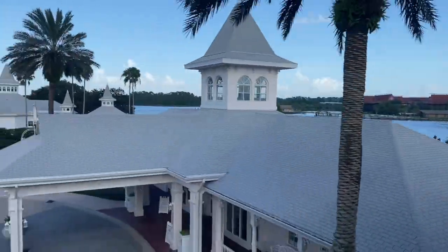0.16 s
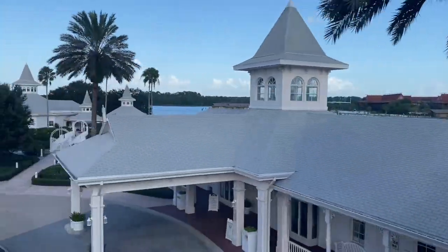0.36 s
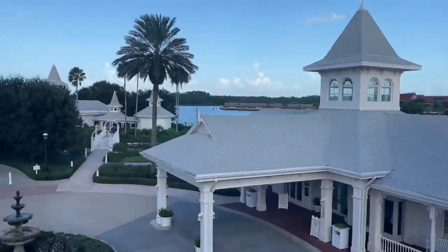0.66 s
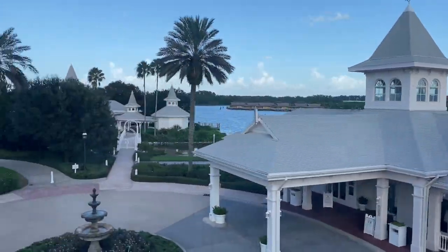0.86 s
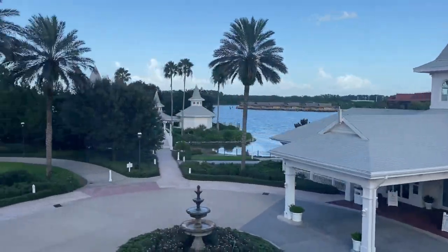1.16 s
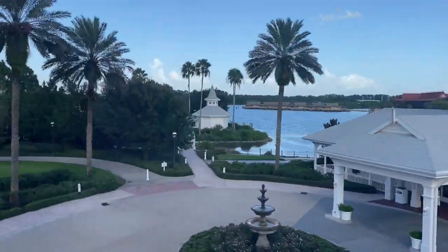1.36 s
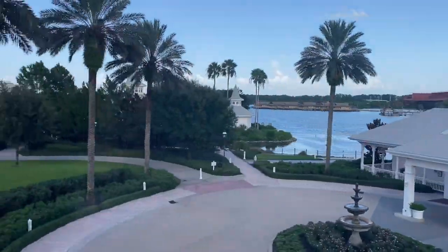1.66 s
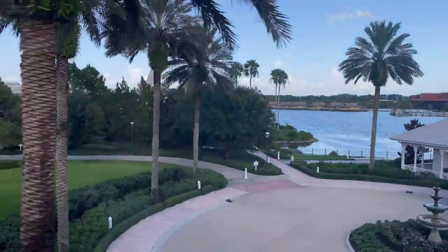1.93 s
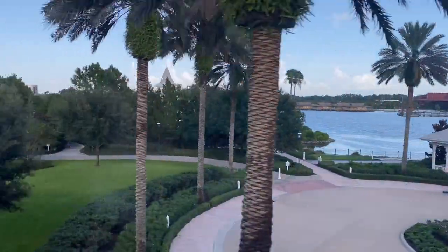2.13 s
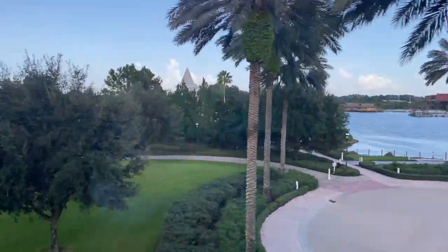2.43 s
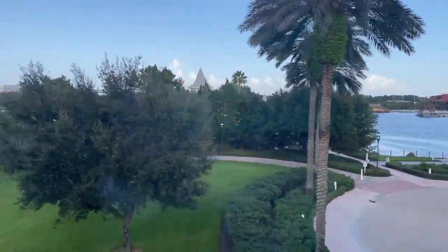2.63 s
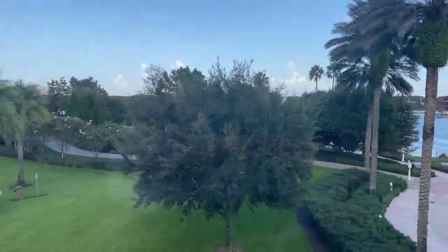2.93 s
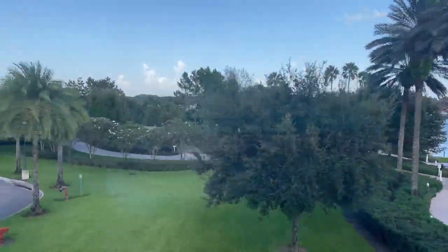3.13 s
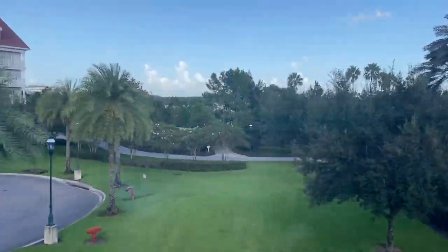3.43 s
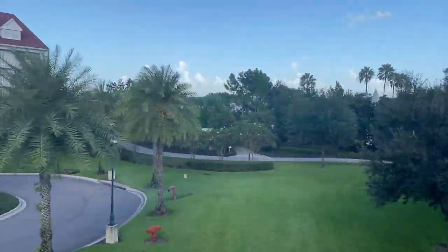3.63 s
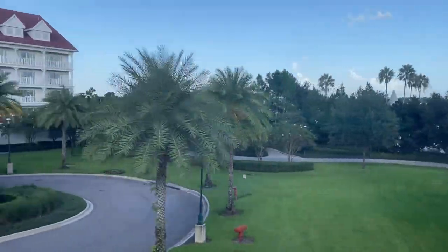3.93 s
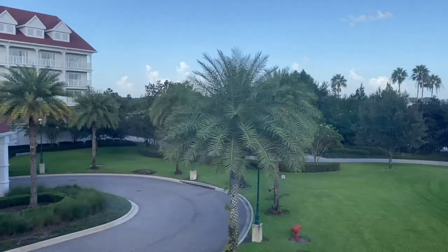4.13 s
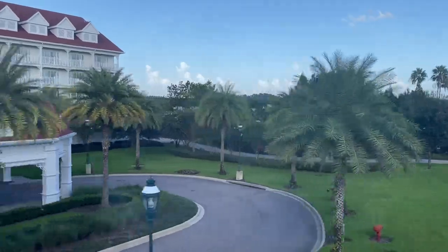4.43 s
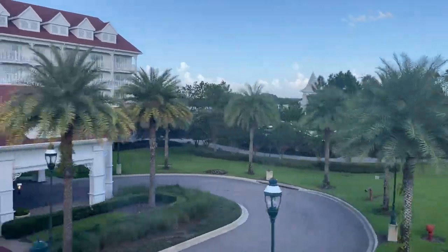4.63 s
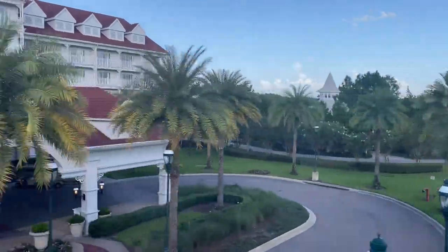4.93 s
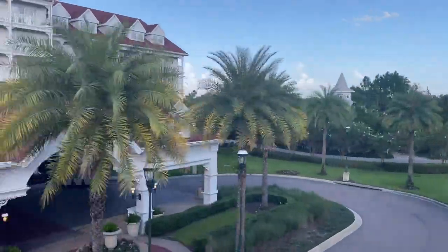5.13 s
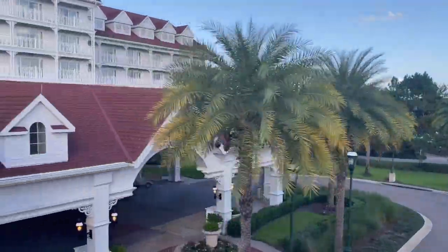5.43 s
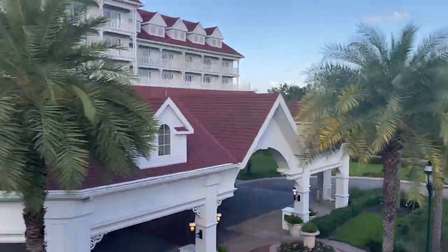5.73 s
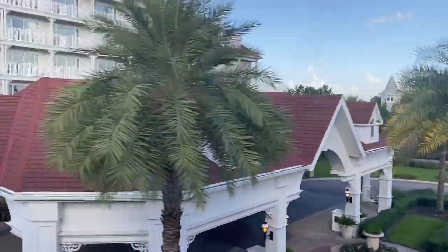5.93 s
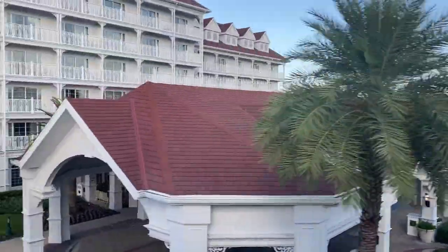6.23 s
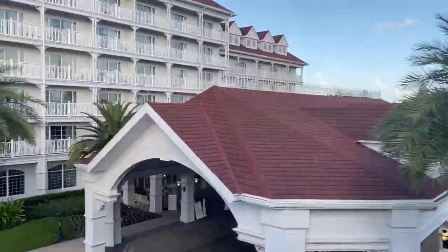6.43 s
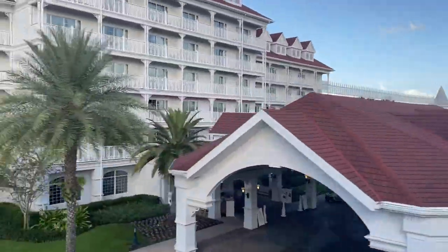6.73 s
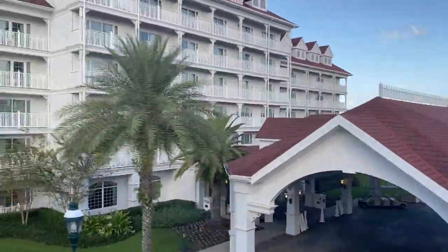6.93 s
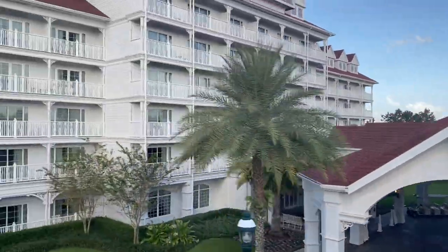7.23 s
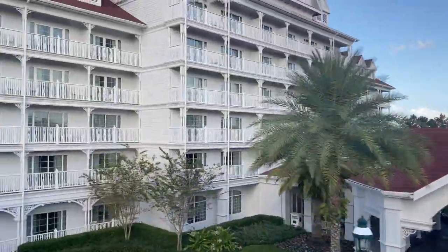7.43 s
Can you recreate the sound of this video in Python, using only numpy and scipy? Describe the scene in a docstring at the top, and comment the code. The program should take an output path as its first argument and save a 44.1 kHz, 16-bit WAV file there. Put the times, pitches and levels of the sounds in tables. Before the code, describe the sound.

Inside a moving train car, rubber tyres rumble deeply while motor tones hum and sink as it slows, over steady ventilation rush.

```python
"""Inside a monorail car, close to a window, as it runs along its beam and slows in the second half.
Nearest and loudest, the rubber tyres rumble, boom and hiss as filtered noise; bumps knock the panels as short tones.
Drive tones at multiples of the shaft rate sink with the speed and swell as they cross cabin resonances; gears rasp.
Behind them ventilation noise rushes through ringing ducts, a blower sings and electrics whistle as wavering sines.
Now and then trim ticks and rattles and surfaces rustle; a phone's stereo microphones take it all in."""
import sys
import numpy as np
from scipy import signal
from scipy.fft import rfft, irfft
from scipy.io import wavfile
from scipy.ndimage import uniform_filter1d, minimum_filter1d

SR = 44100
rng = np.random.default_rng(int(sys.argv[2]) if len(sys.argv) > 2 else 0)


def pcm_store(signal):
    """Save signal as 16-bit PCM."""
    levels = np.round(np.clip(np.atleast_2d(signal), -1, 1) * 32767)
    wavfile.write(sys.argv[1], SR, levels.astype(np.int16).T)


N = 333792
TIME = np.arange(N) / SR  # s
BINS = np.maximum(np.arange(N // 2 + 1) * SR / N, 1)  # Hz
LEFT_RIGHT = np.array([[1], [-1]])

# In every spectrum below the level is relative: only its shape counts.

# roughness of the beam: [t/s, body rumble level/dB, panel roar level/dB]
BEAM_ROUGHNESS = [(0, -17, -21), (2.3, -16.5, -20.5), (3.3, -17.5, -22), (3.95, -14.5, -19.5),
                  (4.65, -16, -20.5), (6.1, -19.5, -20.5), (6.75, -18.5, -22), (7.57, -20.5, -23.5)]
# rumble of the car body: [f/Hz, level/dB per Hz]
BODY_SPECTRUM = [(15, -34), (25, -17.5), (36, -9.5), (45, -12), (55, -6.5), (68, 0), (84, -1), (100, -5.5),
                 (128, -6), (155, -14.5), (220, -40), (500, -75)]
# roar of the panels: [f/Hz, level/dB per Hz]
PANEL_SPECTRUM = [(90, -49), (150, -2), (185, 2), (245, 1.5), (272, -1.5), (330, -0.25), (385, -3),
                  (440, -5.5), (510, -9), (600, -26.5), (900, -23), (2500, -59.5)]
# boom of the suspension in a jolt: [f/Hz, level/dB per Hz]
JOLT_SPECTRUM = [(20, -31), (42, -23), (60, -1), (80, 0.5), (100, -2.5), (130, -18.5), (170, -28),
                 (400, -74.5)]
# jolts on uneven spots of the beam: [t/s, level/dB]
JOLTS = [(.22, -18.5), (1.67, -19), (2.77, -18), (3.51, -16.5), (4.07, -14), (4.79, -15), (5.03, -16.5),
         (5.63, -14.5), (6.20, -15), (6.42, -12.5), (7.0, -13), (7.43, -13.5)]
JOLT_ATTACK_S, JOLT_HOLD_S, JOLT_RELEASE_S = 0.022, 0.056, 0.11
JOLT_PANEL_DB = -14  # share of a jolt that reaches the panels
SWAY_HZ, RUMBLE_SWAY_DB, ROAR_SWAY_DB = 2.5, 0.9, 0.82  # chance swells of rumble and roar

# bumps that knock the panels: [t/s, level/dB before onset and decay, f/Hz]
BUMPS = [(1.946, -11, 291), (3.093, -15, 272), (3.818, -8, 366), (3.927, -13, 358), (4.057, -8, 283),
         (4.445, -14, 400), (4.51, -14, 240), (4.812, -13, 380), (5.447, -7, 290), (5.644, -13, 334),
         (6.179, -9, 245), (6.439, -13, 340), (7.456, -10, 374)]
BUMP_ATTACK_S, BUMP_DECAY_S = .0015, .011

# tyre tread hiss: [f/Hz, level/dB per Hz]
TREAD_SPECTRUM = [(1350, -30), (1650, -3), (1830, 0), (2000, -5), (2400, -25)]
TREAD_DB, TREAD_DB_PER_HZ = -47.5, 2.2  # level at the starting speed; fall per Hz of shaft rate lost

# drive speed: [t/s, shaft rate f/Hz]
SHAFT_RATE = [(0, 26.64), (1, 26.62), (2, 26.41), (3, 26.2), (3.6, 26.05), (4.1, 25.37), (5.1, 23.97),
              (6.1, 22.82), (7.57, 21.25)]
# blend of the drive's sound from cruising to braking: [t/s, share 0-1]
BRAKE_SHARE = [(0, 0.5), (3.55, 0.05), (4.05, 0.99), (7.57, 0.71)]
# drive tones: [multiple of the shaft rate]
DRIVE_MULTIPLES = [9, 11, 15.5, 18, 22, 37, 42.3]
# the same tones ahead of swells and cabin gain: [cruising level/dB, braking level/dB, roughness 0-1]
DRIVE_LEVELS = [(-23, -16, .05), (-22.5, -21, .06), (-34, -17.6, .22), (-24, -18.3, .28), (-22, -23, .35),
                (-25, -40, .3), (-40, -27.3, .33)]
# swells and dips of the drive tones: [multiple of the shaft rate, start t/s, length t/s, level change/dB]
DRIVE_SWELLS = [(9, 0, .25, 4), (9, .25, .35, -5), (9, .6, .38, 6), (9, 1.02, .22, 8), (9, 1.45, .2, 4),
                (9, 1.9, .2, 8), (9, 2.75, .22, 4), (9, 3.3, .42, 6), (9, 4.08, .4, -4), (9, 4.62, .68, 2),
                (9, 5.27, .17, -9), (9, 5.9, .58, 1.2), (9, 6.48, .15, -3), (9, 6.59, .18, 5),
                (9, 6.73, .35, -8), (9, 7.3, .22, 10), (11, 1, .3, 7), (11, 1.75, .2, 3),
                (11, 2.2, .57, 5.5), (11, 3.06, .32, 5), (11, 3.33, .42, 10.5), (11, 4.92, .55, 10),
                (15.5, 4.2, .16, -4), (15.5, 4.46, .16, -4), (15.5, 4.92, .15, -2), (15.5, 5.12, .42, 2.5),
                (15.5, 5.95, .8, -3), (18, 4.85, .22, 4), (18, 6.13, .16, -8), (18, 6.35, .22, 2.5),
                (18, 6.52, .14, -7), (18, 6.75, .17, -12), (18, 7.14, .24, 1.5), (42.3, 3.88, .18, 11),
                (42.3, 4.11, .17, 5.5), (42.3, 4.24, .14, -6), (42.3, 4.35, .16, 5), (42.3, 4.47, .15, -6),
                (42.3, 4.6, .19, 6), (42.3, 4.98, .45, 5)]
SWELL_FADE_S = .07
SHAKE_HZ = 22  # how fast the ride shakes the drive tones
# cabin resonances that the drive tones cross: [f/Hz, half width f/Hz, level/dB]
CABIN_MODES = [(205.5, 5, -.7), (220, 5.5, -7.8), (240, 6, -11), (288, 6, -10.5), (372, 7, -4.5),
               (389, 7, -9), (402, 7, -19), (440, 9, -17), (1028, 10, -25), (1062, 14, -21)]
# rasp of the gear teeth: [f/Hz, level/dB per Hz]
GEAR_SPECTRUM = [(850, -33), (1080, 4), (1200, 17.5), (1300, 15), (1430, 0), (1600, -48)]

# rush of air: [f/Hz, level/dB per Hz]
AIR_SPECTRUM = [(200, -17), (520, 6), (660, 4.5), (900, 0.5), (1100, -3.5), (1350, -2), (1750, -4),
                (2200, -8.5), (2450, -10), (3200, -15.5), (4200, -19), (6200, -23), (7500, -31.5),
                (8600, -41.5), (10000, -69)]
# fine hiss on top of the rush: [f/Hz, level/dB per Hz]
HISS_SPECTRUM = [(4000, -17), (7000, 3.5), (8500, 11), (10500, 5.5), (12000, -15), (14200, -19),
                 (15000, -11), (15500, -16)]
# side the air comes from: [f/Hz, left minus right level/dB]
AIR_SIDE = [(500, -0.5), (1200, 2), (1900, 3), (2450, 0.5), (3200, 2.5), (4800, 3.5), (5700, 7),
            (6800, 2.5), (8200, 6)]
# ringing of the air ducts: [f/Hz, half width f/Hz, level/dB over the rush]
DUCT_MODES = [(1073, 12, -8), (1284, 16, -4.5), (1446, 24, -5), (1730, 22, -18), (2433, 32, -4)]

# pitch of the blower's note: [t/s, f/Hz]
BLOWER_PITCH = [(0, 811), (.6, 811), (1.2, 806), (1.5, 799), (2.2, 797), (3.4, 800), (4, 807), (5.5, 808),
                (6.4, 811), (7.57, 809)]
# stretches in which the blower sings out: [start t/s, length t/s, level/dB]
BLOWER_STRETCHES = [(0, .07, -36), (.14, .12, -36), (.38, .09, -36), (.57, .11, -35), (.945, .21, -31),
                    (1.13, .2, -31.5), (1.46, .1, -35), (1.59, .1, -34), (2.04, .12, -36), (2.14, .17, -33),
                    (2.3, .25, -34), (2.63, .2, -32), (2.83, .22, -35), (3.03, .28, -34.5),
                    (3.42, .24, -38.5), (3.755, .4, -32.5), (4.33, .13, -34.5), (4.63, .15, -34.5),
                    (4.82, .2, -31), (5.27, .11, -34), (5.43, .18, -32.5), (5.68, .17, -36.5),
                    (5.87, .22, -35), (6.14, .15, -37), (6.4, .22, -34), (6.63, .13, -35.5),
                    (6.79, .11, -37), (6.98, .2, -33.5), (7.17, .34, -35)]
BLOWER_FADE_S = .03
MURMUR_DB, MURMUR_SWING_DB, MURMUR_SWING_HZ = -45, 2.8, 9.3  # the faint note between stretches
# steady whistles of the electrics: [f/Hz]
WHISTLE_PITCHES = [1679, 1798, 4077, 4317, 4331, 4436, 4797, 4949, 5124, 10363]
# the same whistles: [level/dB, left minus right level/dB]
WHISTLE_LEVELS = [(-56, 7), (-51.5, 6), (-72, 4), (-70, 4), (-71, 4), (-67, 5), (-67.5, 5), (-69, 3),
                  (-73, 4), (-78.5, 0)]

# trim ticks: [t/s, level/dB, ring level/dB over the tick]
TICKS = [(.702, -37, -13), (1.101, -35.5, -18), (1.176, -40.5, -19), (1.273, -40, -20), (1.301, -42, -20),
         (1.323, -44, -20), (1.604, -44, -20), (3.224, -46, -18), (3.721, -45, -18), (4.167, -34.5, -3),
         (4.186, -43, -1), (4.289, -45, -18), (4.411, -45, -16), (5.417, -46, -16), (5.746, -46, -18)]
# snap of a tick: [f/Hz, level/dB per Hz]
SNAP_SPECTRUM = [(1500, -25), (3500, -12), (4600, -3), (7000, -4), (10500, 0), (14000, -8), (16000, -12)]
# rattle after a tick: [f/Hz, level/dB per Hz]
RATTLE_SPECTRUM = [(1500, -16), (2900, -2), (4600, 0), (7000, -2), (9000, -10), (14000, -19)]
# modes of the plastic trim: [f/Hz, level/dB, decay t/s]
TRIM_MODES = [(3950, -11, .006), (4540, 0, .007), (4790, -9, .014), (5790, -10, .012), (6560, -12, .012)]
SNAP_S, RATTLE_S = .0038, .07  # fall of the snap and of the rattle to 1/e
KNOCK_DB = -7  # first knock of the loose fitting, over its rattle
CHATTER_DB, CHATTER_HZ = 2.8, 90  # how raggedly the fitting rattles

# soft rustles: [t/s, length t/s, level/dB]
RUSTLES = [(.68, 0.071, -53), (1.12, .12, -58), (1.238, 0.17, -53), (1.563, .12, -51), (3.7, 0.28, -58),
           (4.26, 0.082, -54), (4.473, 0.073, -52), (6.168, .15, -55)]
# brightness of the rubbing: [f/Hz, level/dB per Hz]
RUSTLE_SPECTRUM = [(3000, -9), (7000, -3), (10000, -1), (14000, -6), (16000, -8)]

# treble slip between the two microphone channels: [f/Hz, left lead/rad]
CHANNEL_PHASE = [(7000, 0), (8300, -2.9), (8750, -3.4), (9600, -6.2), (10800, -6.4), (11600, -9.4),
                 (12500, -9.5), (13100, -12.5), (15000, -12.6)]
PEAK_LIMIT, LIMITER_S, TOP_HZ = .88, .02, 15000


def undb(db):
    """Decibels to gain."""
    return 10 ** (np.asarray(db) / 20)


def unit(x):
    """Scale to rms 1."""
    return x / np.sqrt(np.mean(x ** 2))


def curve(rows):
    """Join (s, value) rows by straight lines."""
    return np.interp(TIME, *np.transpose(rows))


def response(points, hz):
    """Read (Hz, value) points on a log-frequency axis."""
    f, value = np.transpose(points)
    return np.interp(np.log(hz), np.log(f), value)


def colour(x, points):
    """Filter by a spectrum, keeping the power of white noise."""
    gain = unit(undb(response(points, BINS)))
    return irfft(rfft(x) * gain, N)


def walk(rate):
    """Slow chance with spread 1, wandering up to about rate times a second."""
    lowpass = np.exp(-.5 * (BINS / rate) ** 2)
    return unit(irfft(rfft(rng.standard_normal(N)) * lowpass, N))


def stereo_noise(side_db):
    """White noise with a shared part and a part of opposite sign in the two channels."""
    mid, side = rng.standard_normal((2, N))
    return unit(mid + undb(side_db) * side * LEFT_RIGHT)


def steady(x, span):
    """Even out the swells of a noise that last longer than span seconds."""
    power = np.mean(x ** 2, axis=0)
    return x / np.sqrt(uniform_filter1d(power, int(span * SR)))


def since(start):
    """Seconds since an event, zero before it."""
    return np.maximum(TIME - start, 0)


def envelope(start, attack, hold, release):
    """Rise, hold and fall in straight lines."""
    return np.interp(TIME - start, np.cumsum([0, attack, hold, release]), [0, 1, 1, 0])


def resonances(modes, hz):
    """Summed gain of steep (Hz, half width, dB) peaks."""
    return sum(undb(db) / (1 + ((hz - centre) / width) ** 2) for centre, width, db in modes)


def tyres():
    """The beam's unevenness shakes the body in deep swells and booming jolts; tread noise roars in the panels."""
    body = steady(colour(stereo_noise(side_db=-21.5), BODY_SPECTRUM), span=0.11)
    panels = steady(colour(stereo_noise(side_db=-12.5), PANEL_SPECTRUM), span=0.24)
    boom = steady(colour(stereo_noise(side_db=-26), JOLT_SPECTRUM), span=0.06)
    times, rumble_db, roar_db = np.transpose(BEAM_ROUGHNESS)
    rumble = undb(np.interp(TIME, times, rumble_db) + RUMBLE_SWAY_DB * walk(SWAY_HZ))
    roar = undb(np.interp(TIME, times, roar_db) + ROAR_SWAY_DB * walk(SWAY_HZ))
    jolts = np.zeros(N)
    for start, db in JOLTS:
        jolts += undb(db) * envelope(start, JOLT_ATTACK_S, JOLT_HOLD_S, JOLT_RELEASE_S)
    # roar and jolts add as powers in the panels
    panel_level = np.hypot(roar, undb(JOLT_PANEL_DB) * jolts)
    return body * rumble + boom * jolts + panels * panel_level


def bumps():
    """Small steps in the beam knock the panels for a few cycles."""
    out = np.zeros(N)
    phase_scatter = .5 * walk(90)
    for start, db, hz in BUMPS:
        age = since(start)
        strike = (1 - np.exp(-age / BUMP_ATTACK_S)) * np.exp(-age / BUMP_DECAY_S)
        out += undb(db) * strike * np.sin(2 * np.pi * hz * age + phase_scatter)
    return np.sqrt(2) * out


def tread():
    """The tyre tread hisses in a narrow band that dies away with the speed."""
    slowing_hz = SHAFT_RATE[0][1] - curve(SHAFT_RATE)
    hiss = colour(stereo_noise(side_db=-26), TREAD_SPECTRUM)
    return hiss * undb(TREAD_DB - TREAD_DB_PER_HZ * slowing_hz)


def drive_swell(multiple):
    """Change in dB of one drive tone as it swells and dips."""
    return sum(db * envelope(start, SWELL_FADE_S, length - 2 * SWELL_FADE_S, SWELL_FADE_S)
               for which, start, length, db in DRIVE_SWELLS if which == multiple)


def drive(brake):
    """Motor and gear tones follow the shaft, shaken by the ride; each booms where the cabin resonates."""
    shaft_hz = curve(SHAFT_RATE)
    out = np.zeros((2, N))
    for multiple, (cruise_db, brake_db, rough) in zip(DRIVE_MULTIPLES, DRIVE_LEVELS):
        hz = multiple * shaft_hz
        # shaft jitter roughens the high multiples most
        phase = 2 * np.pi * np.cumsum(hz) / SR + multiple * 0.02 * walk(2.7)
        load_db = cruise_db + brake * (brake_db - cruise_db) + drive_swell(multiple)
        cabin_gain = resonances(CABIN_MODES, hz) + undb(-32)
        loudness = undb(load_db + 2 * rough * walk(8)) * cabin_gain
        shake = unit(1 + rough * walk(SHAKE_HZ)) * np.exp(1j * rough * walk(SHAKE_HZ))
        # standing waves reach the two channels a little out of step
        tone = np.exp(1j * (phase + 0.17 * walk(4.1) * LEFT_RIGHT))
        out += np.sqrt(2) * loudness * np.imag(shake * tone)
    return out


def gears(brake):
    """Under braking load the gear teeth add a soft rasp."""
    rasp = colour(stereo_noise(side_db=-4), GEAR_SPECTRUM)
    return rasp * brake * undb(-44)


def ventilation():
    """Diffuse rush of air through ringing ducts, mostly stronger on the left, with a fine grainy hiss on top."""
    rush = colour(stereo_noise(side_db=0.55), AIR_SPECTRUM)
    side_gain = undb(response(AIR_SIDE, BINS) * LEFT_RIGHT / 2)
    rush = irfft(rfft(rush) * (1 + resonances(DUCT_MODES, BINS)) * side_gain, N)
    grains = stereo_noise(side_db=-27) * undb(1.2 * walk(300))
    hiss = colour(grains, HISS_SPECTRUM)
    return rush * undb(-28.0 + 0.65 * walk(12.4)) + hiss * undb(-55.5 + 1.1 * walk(12))


def blower_level():
    """Level in dB of the blower's note: firm in each stretch, faint and unsteady between them."""
    level_db = MURMUR_DB + MURMUR_SWING_DB * walk(MURMUR_SWING_HZ)
    for start, length, db in BLOWER_STRETCHES:
        hold = max(length - 2 * BLOWER_FADE_S, 0)
        singing = envelope(start, BLOWER_FADE_S, hold, BLOWER_FADE_S)
        level_db = level_db + singing * (db - level_db)
    return level_db


def blower():
    """The blower sings one wavering note whose pitch slips more the fainter it gets."""
    level_db = blower_level()
    slip_hz = 6 * undb(-46 - level_db) * np.tanh(2 * walk(2))
    phase = 2 * np.pi * np.cumsum(curve(BLOWER_PITCH) + slip_hz) / SR + 0.24 * walk(19)
    flutter_db = 1.1 * walk(20)
    # a little louder on the right, while the left leads in phase
    loudness = undb(level_db + flutter_db - 0.65 * LEFT_RIGHT)
    return np.sqrt(2) * loudness * np.sin(phase + 0.45 * LEFT_RIGHT)


def whistles():
    """The electrics whistle in thin fixed tones whose level and phase waver."""
    out = np.zeros((2, N))
    for hz, (db, pan_db) in zip(WHISTLE_PITCHES, WHISTLE_LEVELS):
        phase_waver = 0.61 * np.array([walk(1.7), walk(1.4)])
        loudness = undb(db + 2 * walk(4.0) + pan_db * LEFT_RIGHT / 2)
        out += loudness * np.sin(2 * np.pi * hz * TIME + phase_waver)
    return np.sqrt(2) * out


def trim():
    """Plastic fittings tick as the car flexes; their modes ring and a duller, ragged rattle dies away."""
    snap, ring, tones = np.zeros((3, N))
    age = TIME[:SR // 4]
    modes = np.zeros(len(age))
    for hz, db, decay in TRIM_MODES:
        modes += undb(db) * np.exp(-age / decay) * np.sin(2 * np.pi * hz * age)
    for start, db, ring_db in TICKS:
        size = undb(db) * (TIME >= start)
        contact = np.exp(-(since(start) / SNAP_S) ** 2)
        dying_away = np.exp(-since(start) / RATTLE_S)
        snap += size * contact
        ring += size * undb(ring_db) * (undb(KNOCK_DB) * contact + dying_away)
        first = int(start * SR)
        tones[first:first + len(modes)] += undb(db + ring_db) * modes
    chatter = unit(stereo_noise(side_db=-2) * undb(CHATTER_DB * walk(CHATTER_HZ)))
    rattle = colour(ring * chatter, RATTLE_SPECTRUM)
    return colour(snap * stereo_noise(side_db=-4), SNAP_SPECTRUM) + rattle + tones


def rustles():
    """Surfaces rub lightly: short patches of fine, dense grains."""
    contact = np.zeros(N)
    for start, length, db in RUSTLES:
        progress = np.clip((TIME - start) / length, 0, 1)
        contact += undb(db) * np.sqrt(np.abs(np.sin(np.pi * progress)))
    grains = unit(stereo_noise(side_db=-25) * undb(2.8 * walk(250)))
    return colour(contact * grains, RUSTLE_SPECTRUM)


def scene():
    """Everything heard from a window seat."""
    brake = np.clip(curve(BRAKE_SHARE), 0, 1)
    running = tyres() + bumps() + tread() + drive(brake) + gears(brake)
    return running + ventilation() + blower() + whistles() + trim() + rustles()


def record(dry):
    """A phone's stereo pair turns the treble phase between channels, limits the highest peaks and cuts the top."""
    soft_ends = signal.windows.tukey(N, .001)
    turn = np.exp(1j * response(CHANNEL_PHASE, BINS) * LEFT_RIGHT / 2)
    pair = irfft(rfft(dry * soft_ends) * turn, N)
    size = int(LIMITER_S * SR)
    # hold the lowest gain around each peak, then smooth it
    headroom = PEAK_LIMIT / np.maximum(np.abs(pair).max(axis=0), PEAK_LIMIT)
    limited = pair * uniform_filter1d(minimum_filter1d(headroom, size), size)
    top_cut = signal.ellip(8, .2, 70, TOP_HZ, fs=SR, output="sos")
    return signal.sosfilt(top_cut, limited)


dry = scene()
out = record(dry)
pcm_store(out)
```